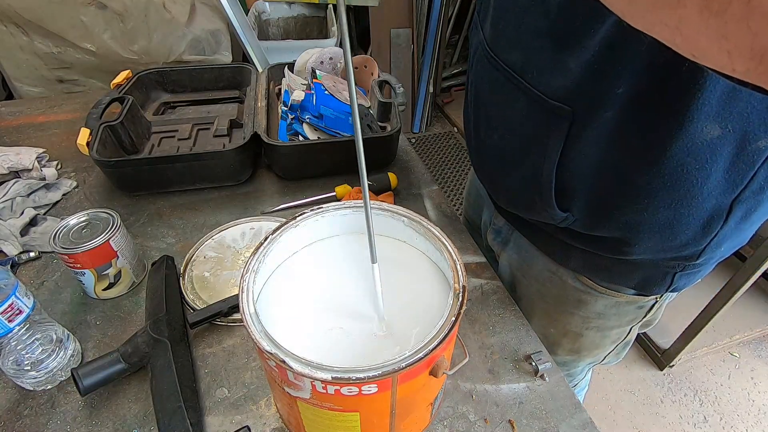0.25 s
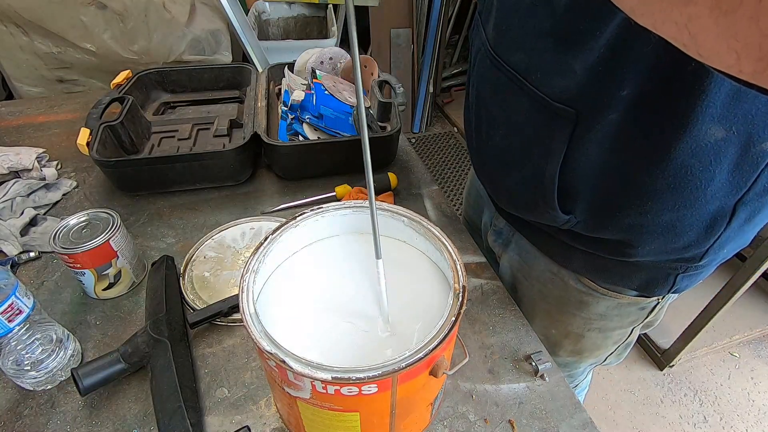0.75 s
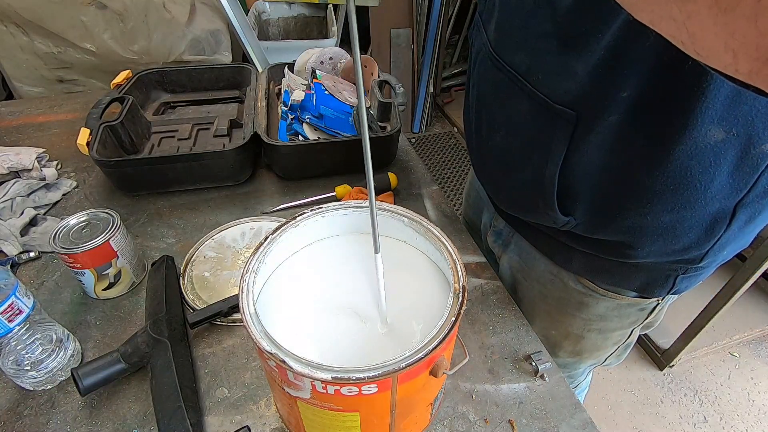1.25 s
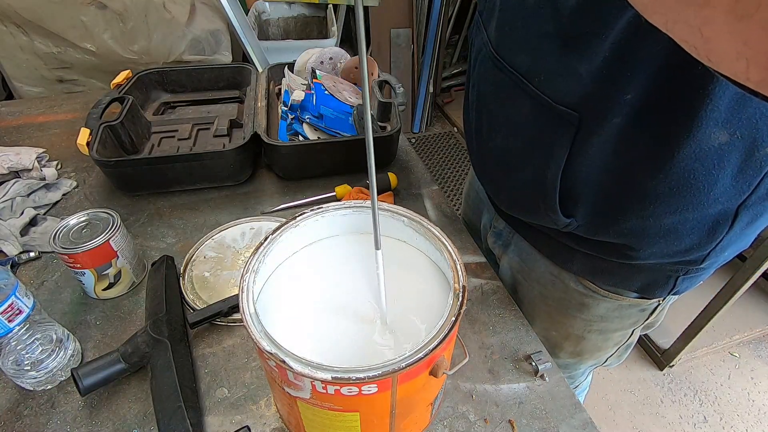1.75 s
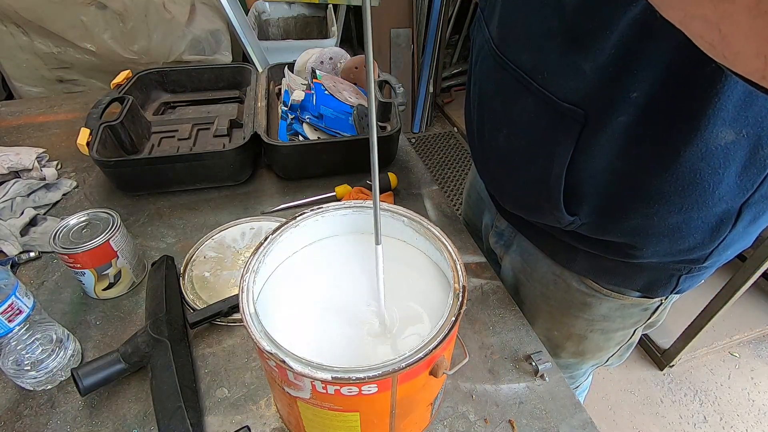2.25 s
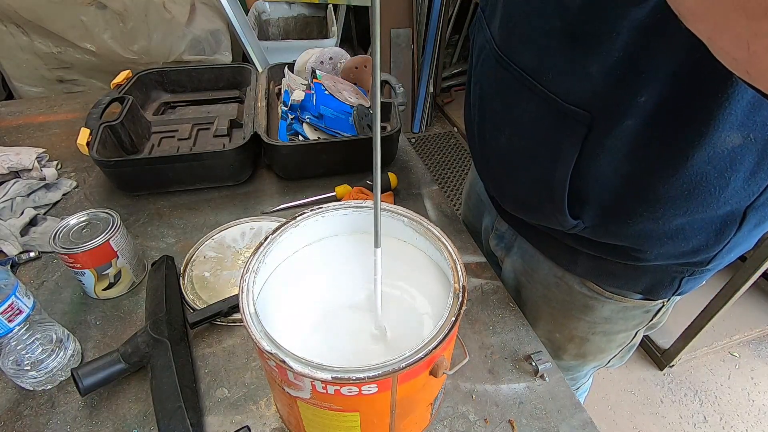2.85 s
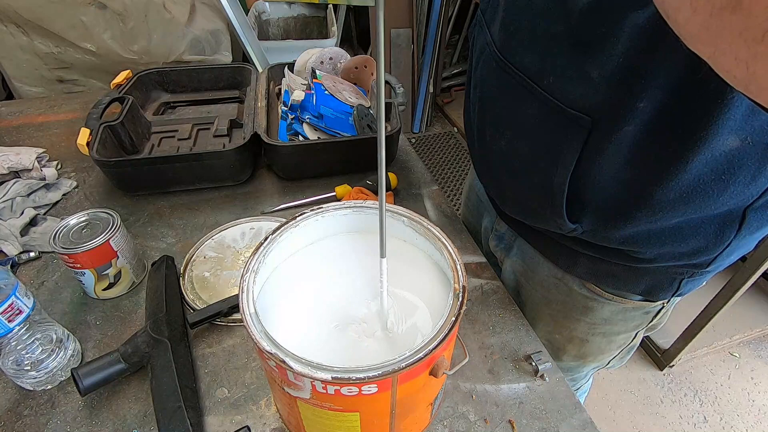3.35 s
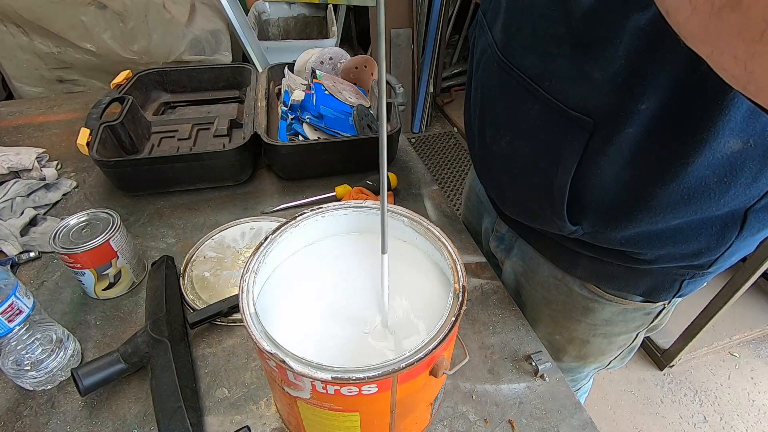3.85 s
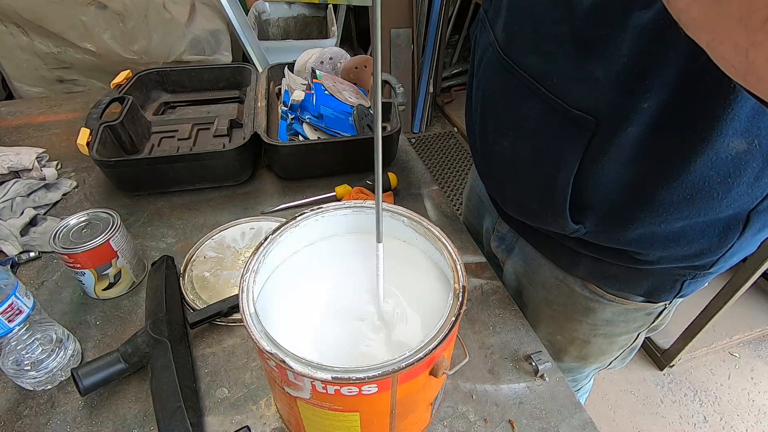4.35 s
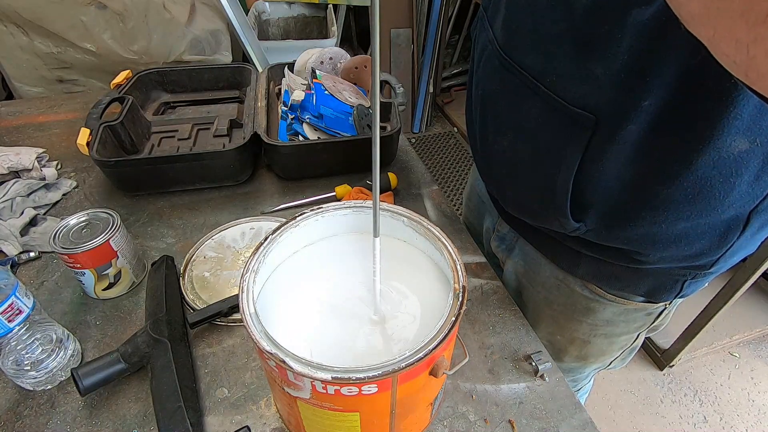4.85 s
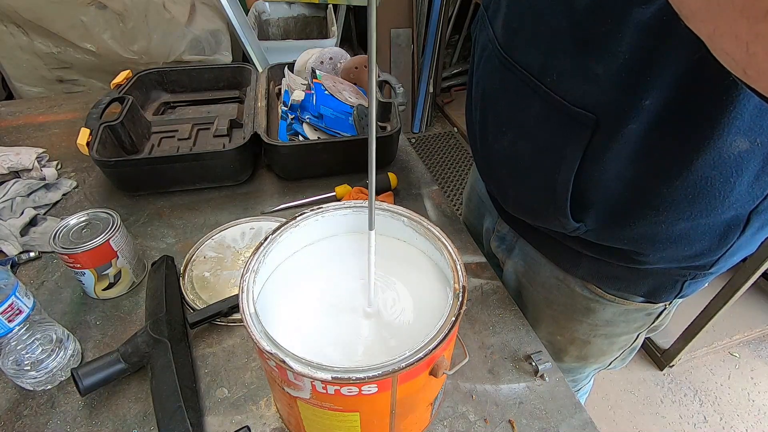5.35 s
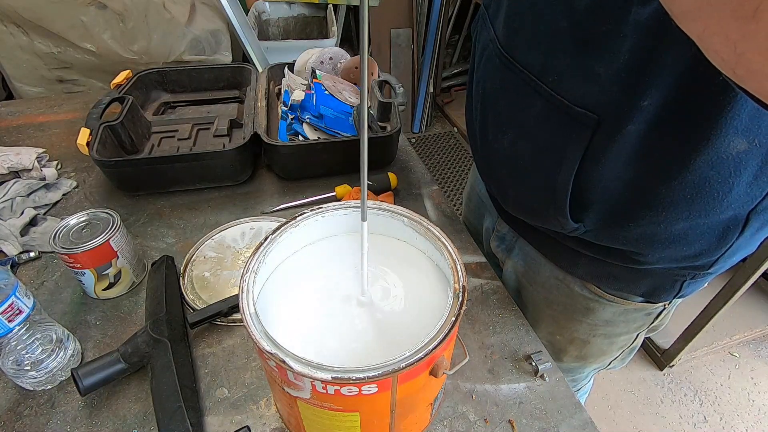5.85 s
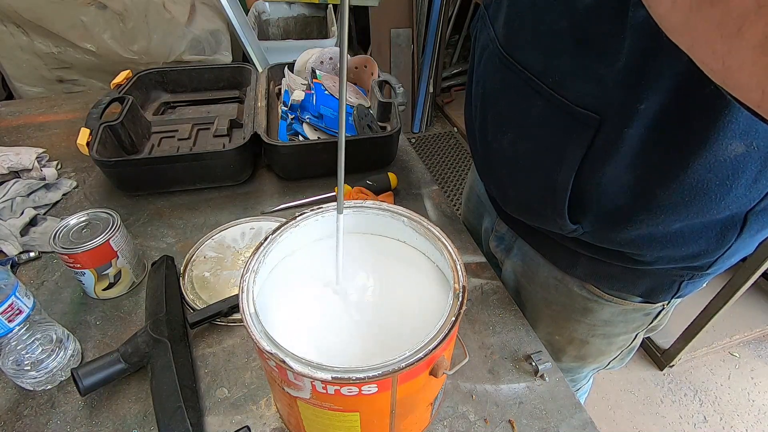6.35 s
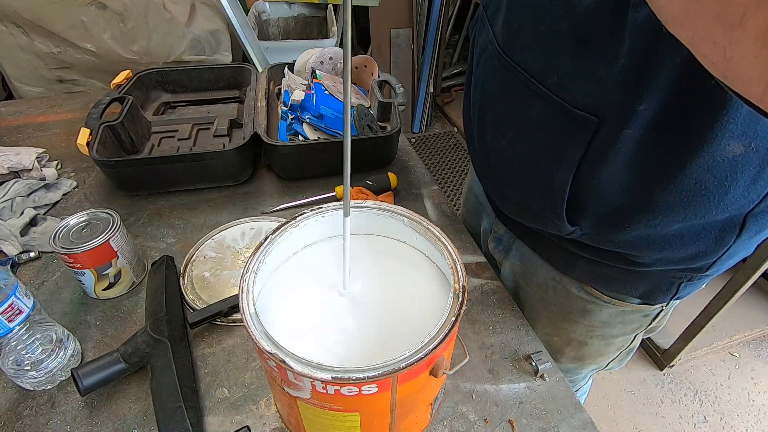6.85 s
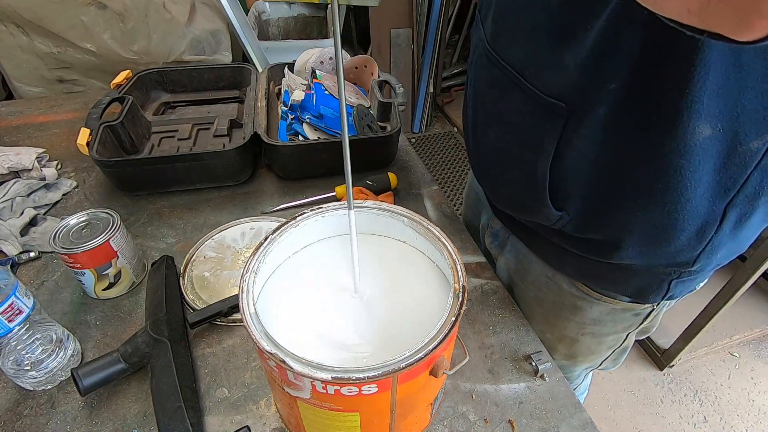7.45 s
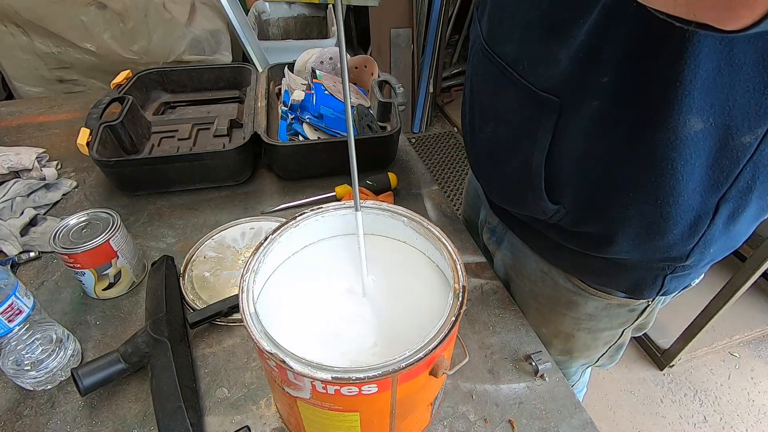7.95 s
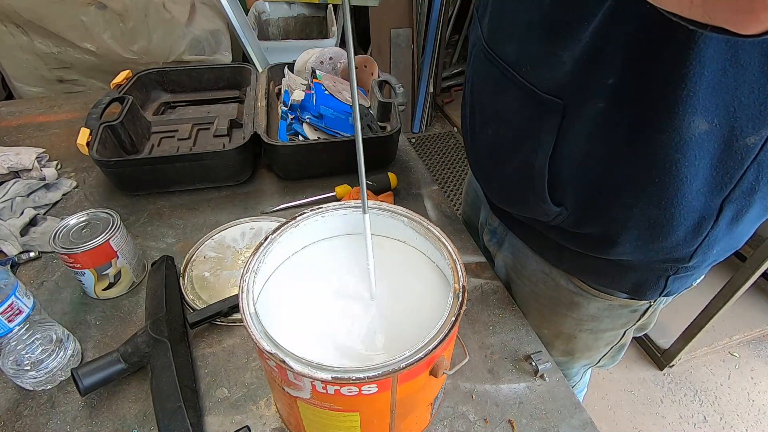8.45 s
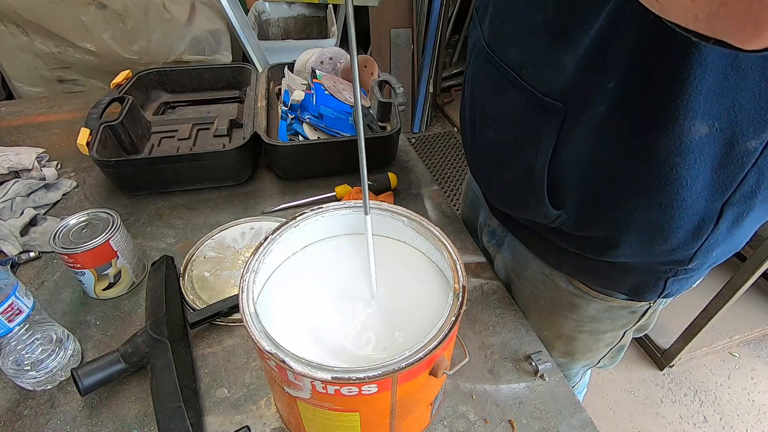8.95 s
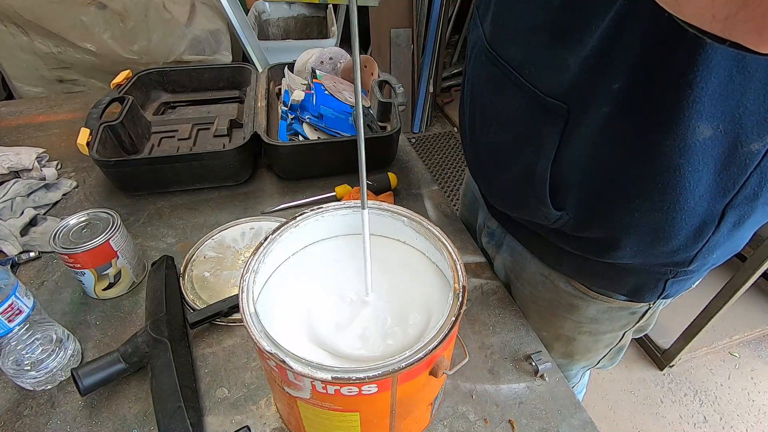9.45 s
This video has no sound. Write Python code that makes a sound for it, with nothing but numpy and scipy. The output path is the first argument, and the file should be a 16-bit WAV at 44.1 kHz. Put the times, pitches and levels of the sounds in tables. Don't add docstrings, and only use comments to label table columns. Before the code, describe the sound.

Steady, noisy electric drill at close range, with buzzing gear teeth, ringing housing, airy fan hiss and a piercing thin whine, leaning somewhat left. After almost nine seconds it stops fast with a falling squeal and a cluster of dry clacks, leaving a short room echo and a faint slide. One small falling bird chirp follows from outside, then a trigger click, a loud chuck knock and the motor climbing again.

```python
import sys
import numpy as np
from scipy import signal
from scipy.fft import rfft, irfft, next_fast_len
from scipy.io import wavfile

SR = 44100
rng = np.random.default_rng(int(sys.argv[2]) if len(sys.argv) > 2 else 0)


def convert_level_to_amplitude(level_db):
    exponent = np.asarray(level_db, float) / 20
    return 10 ** exponent


def wrap_up_sound(samples):
    columns = np.atleast_2d(samples).T
    tamed = np.clip(columns, -1, 1)
    steps = np.round(tamed * 32767).astype(np.int16)
    wavfile.write(sys.argv[1], SR, steps)


N = 427769
TIME, SIZE = np.arange(N) / SR, next_fast_len(N)
HZ = np.maximum(np.fft.rfftfreq(SIZE, 1 / SR), 1)


def rms_one(x):
    return x / np.sqrt(np.mean(x ** 2) + 1e-20)


def in_time(rows):
    s, *columns = np.transpose(rows)
    return [np.interp(TIME, s, c) for c in columns]


def at_hz(points, hz):
    point_hz, value = np.array(points)[:, :2].T
    return np.interp(np.log(hz), np.log(np.maximum(point_hz, 1)), value)


def during(rows, fade_s=0.0031):
    inside_s = np.minimum(TIME - rows[0][0], rows[-1][0] - TIME)
    return np.clip(inside_s / fade_s + 1, 0, 1)


def drift(rate_hz):
    r = np.exp(-2 * np.pi * rate_hz * 40 / SR)
    slow = signal.lfilter([1], [1, -2 * r, r * r], rng.standard_normal(N // 40 + 2002))[2000:]
    return np.interp(np.arange(N) / 40, np.arange(len(slow)), rms_one(slow))


def pan(left_over_right_db):
    return convert_level_to_amplitude(np.multiply.outer([.5, -.5], left_over_right_db))


# pitch_hz, shared_fraction
ALIKE = [(60, 0.23), (350, 0.98), (700, 0.87), (1400, 0.75), (3000, 1), (5500, 0.88), (9000, 0.54),
         (14000, 0.13)]
# pitch_hz, left_over_right_db
LEAN = [(60, 0.0), (110, 0.5), (200, -1), (370, 0), (690, 5.5), (1270, 6.5), (2340, 7), (4310, 2),
        (7940, 2.5), (14600, 20)]
# pitch_hz, left_lead_rad
LEAD = [(350, .6), (690, .2), (1030, -.6), (2150, -.5), (3270, -.4), (4500, .3), (5800, 1.3), (7150, 2),
        (9390, 2.9), (11700, 2.6), (14000, 3.3)]


def port_noise(*colours, pulsing=1, at_drill=1):
    shared, left, right = rfft(rng.standard_normal((3, N)) * pulsing, SIZE)
    alike = np.clip(at_hz(ALIKE, HZ), 0, 1)
    turn = np.exp(.5j * at_drill * np.multiply.outer([1, -1], at_hz(LEAD, HZ)))
    both = np.sqrt(alike) * shared * turn + np.sqrt(1 - alike) * np.array([left, right])
    both *= pan(at_drill * at_hz(LEAN, HZ))
    layers = [irfft(both * convert_level_to_amplitude(at_hz(colour, HZ)), SIZE)[:, :N] for colour in colours]
    return [x / np.sqrt(np.mean(x.mean(axis=0) ** 2)) for x in layers]


BOG_S, BOG_WIDTH_S, BOG_TURNS = 2.75, 0.27, 1.35


def bog():
    return np.exp(-((TIME - BOG_S) / BOG_WIDTH_S) ** 2)


# time_s, tilt_db
TILT = [(0.0, 4), (0.4, 1), (0.8, -5), (2.3, -6.5), (3.25, -1), (3.55, 0), (4.5, 7), (5.2, 5), (5.7, 1.5),
        (6.25, 8), (6.75, 8), (7.15, 3), (7.5, 3), (7.75, 5), (8.5, 7), (8.77, 3)]
TURN_S, TURN_TAKES_S = 7.34, 0.3


def aimed(db, tilt_share, turned_db, bogged_db, deeper_db=0):
    turned = np.clip((TIME - TURN_S) / TURN_TAKES_S + .5, 0, 1)
    deeper = np.clip((TIME - BOG_S) / BOG_WIDTH_S + 1, 0, 1)
    handled_db = tilt_share * in_time(TILT)[0] + turned_db * turned
    return db + handled_db + bogged_db * bog() + deeper_db * deeper


# pitch_hz, left_lead_rad
TONE_LEAD = [(350, 1), (720, 1), (1440, -.5), (4300, -.5), (5760, 1.3), (7300, .3), (8300, -.1)]


def lines(rows, orders, levels, waver_db=None):
    gate = during(rows)
    on = slice(*np.flatnonzero(gate)[[0, -1]])
    speed = (in_time(rows)[0] - BOG_TURNS * bog())[on]
    angle = 2 * np.pi * np.cumsum(speed) / SR
    out = np.zeros((2, N))
    for multiple, db in zip(orders, levels):
        hz = multiple * speed.mean()
        lead = .5 * at_hz(TONE_LEAD, hz) * np.array([[1], [-1]])
        start = rng.uniform(0, 2 * np.pi) + lead
        level_db = (db + waver_db * drift(8.0))[on] if waver_db else db
        tone = np.sqrt(2) * convert_level_to_amplitude(level_db) * np.sin(multiple * angle + start)
        out[:, on] += pan(0.14 * at_hz(LEAN, hz))[:, None] * tone
    return out * gate


# time_s, motor_turns_per_s
STIR = [(0.0, 357.5), (0.25, 358.4), (1.25, 359.55), (2.25, 359.8), (3.5, 359.65), (4.25, 360.35),
        (5.25, 360.9), (6.25, 361.6), (7.0, 361.95), (7.75, 361.9), (8.25, 362.22), (8.77, 362.2)]
STRONG_ORDERS = [16, 4, 8, 23, 9.182, 10, 10.182]
# level_db, tilt_share, turned_db, bogged_db, deeper_db
STRONG = [(-46.5, 0.06, -11, 3.5, 1), (-55.5, -0.14, 2, -2, 0.1), (-65, 0.2, -3, 0, 10.5),
          (-65.5, 0.78, 0.1, 5, -0.3), (-53.5, -0.65, -3, -2.5, 1.5), (-73, 0.24, 5, 3, 0.1),
          (-63, 0.05, 5, 2, 1.5)]
WEAK_ORDERS = [1, 1.058, 1.271, 2, 3, 6, 7, 9.125, 11.182, 12, 15, 20.363]
WEAK_DB = [-71, -77, -82, -82, -77, -72, -70, -61, -72, -65, -71, -71]
# time_s, motor_turns_per_s, whine_db
BRAKE = [(8.77, 356, -60), (8.79, 343, -52), (8.80, 332, -44), (8.815, 312, -41), (8.832, 281, -43),
         (8.845, 255, -47), (8.857, 235, -58)]
BRAKE_ORDERS = [4, 6, 10, 14, 16]
BRAKE_DB = [-13, 0, 1, -7, -12]
# time_s, motor_turns_per_s, whine_db
RESTART = [(9.58, 160, -64), (9.61, 184, -57), (9.65, 206, -55), (9.67, 218, -56), (9.7, 234, -52)]
RESTART_ORDERS = [1, 2, 3, 4, 5, 6, 7, 8]
RESTART_DB = [-11, -8, 0, -2, -4, -3, -6, -7]


def motor():
    out = lines(STIR, STRONG_ORDERS, [aimed(*row) for row in STRONG], waver_db=0.33)
    out += lines(STIR, WEAK_ORDERS, WEAK_DB)
    out += convert_level_to_amplitude(in_time(BRAKE)[1]) * lines(BRAKE, BRAKE_ORDERS, BRAKE_DB)
    climb_db = in_time(RESTART)[1] + 2.6 * drift(40)
    out += convert_level_to_amplitude(climb_db) * lines(RESTART, RESTART_ORDERS, RESTART_DB, waver_db=1.5)
    return out


SWITCHING_HZ, SWITCHING_DB = 7986, -52


def chopped_current():
    rotor = 2 * np.pi * np.cumsum(in_time(RESTART)[0]) / SR
    carrier = 2 * np.pi * SWITCHING_HZ * TIME
    chop = np.sin(carrier + rotor) + .7 * np.sin(carrier - rotor)
    level = convert_level_to_amplitude(SWITCHING_DB + 1.5 + 1.8 * drift(60)) * during(RESTART, fade_s=0.046)
    return level * chop * [[1.2], [.6]]


# time_s, level_db
STALL = [(9.37, -90), (9.39, -76), (9.455, -77), (9.475, -74), (9.51, -72), (9.52, -90)]
STALL_HZ = 1990


def stall_hum():
    level = convert_level_to_amplitude(in_time(STALL)[0] + 2.5 * drift(30)) * during(STALL)
    return level * np.sin(2 * np.pi * STALL_HZ * TIME)


# time_s, level_db against stirring
LET_GO = [(8.73, 0.0), (8.75, 0.5), (8.834, -1.5), (8.84, -6), (8.86, -6)]
# time_s, level_db against stirring
RERUN = [(9.515, 0), (9.53, -6), (9.555, -7), (9.575, -2), (9.6, 2.5), (9.65, 3.5), (9.7, 3)]
# level_db, tilt_share, turned_db, bogged_db, drive_share
GEARS = [
    (-41.5, 0.051, 0.6, 0.2, 0.93),
    (-48, -0.05, -2.5, 1.5, 0.72),
    (-51, 0.073, -2, 0.7, 0.6),
    (8, -0.09, -0.3, -1.5, 0.1),
]
# pitch_hz, density_db per Hz
RATTLE = [(250, -75), (340, -28.5), (520, -25.5), (830, -17.5), (1070, -9.5), (1340, -12), (1700, -11),
          (2300, -6), (2700, -4.5), (3000, 1.5), (3300, 1), (3650, -1.5), (3950, -11.5), (4400, -39.5)]
# pitch_hz, density_db per Hz
RING = [(3500, -25), (3950, 0), (4300, 4), (4900, 3), (5400, -4), (5800, -49)]
# pitch_hz, density_db per Hz
HISS = [(4900, -27.5), (5500, 2), (6150, -1.5), (6700, 3.5), (7500, 3), (8200, -3.5), (10200, -7),
        (11400, -20), (12000, -29.5), (13000, -26), (14000, -35)]
ENGAGE_S, IDLE_FAN_DB = 9.565, -2
SLOW_FAN_DB, SLOW_RING_DB, SLOW_LEAN_DB = 1.5, 3.5, -3
RESTART_HISS_CUT_HZ, SLOW_CHATTER_DB = 7600, 3


def gears():
    drive_db = in_time(LET_GO + RERUN)[0]
    slow = TIME > LET_GO[-1][0] + .1
    rattle_db, ring_db, hiss_db, lean_db = [aimed(*row) + share * drive_db for *row, share in GEARS]
    hiss_db += slow * np.where(TIME < ENGAGE_S, IDLE_FAN_DB, SLOW_FAN_DB)
    ring_db = ring_db + slow * SLOW_RING_DB
    lean_db = lean_db + slow * SLOW_LEAN_DB
    running = np.maximum(during([STIR[0], LET_GO[-1]]), during(RERUN))

    rotor = 2 * np.pi * np.cumsum(in_time(STIR)[0] - BOG_TURNS * bog()) / SR
    pulsing = convert_level_to_amplitude(.5 * np.sin(rotor)) * convert_level_to_amplitude(0.18 * drift(130))
    rattle, ring, hiss = port_noise(RATTLE, RING, HISS, pulsing=pulsing)
    dull = signal.sosfilt(signal.butter(2, RESTART_HISS_CUT_HZ, fs=SR, output="sos"), hiss)
    hiss = np.where(slow, dull, hiss)
    rattle = rattle * convert_level_to_amplitude(slow * SLOW_CHATTER_DB * drift(90))

    paddle = np.sin(rotor / 19.1)
    wobble = .5 * drift(19) + 0.16 * paddle
    low = convert_level_to_amplitude(rattle_db - 1.32 + 0.57 * wobble) * rattle
    low += convert_level_to_amplitude(ring_db - 2.5 + 0.71 * wobble) * ring
    high = convert_level_to_amplitude(hiss_db + 0.88 + 0.65 * wobble + 0.45 * drift(5.9)) * hiss
    return running * (low * pan(lean_db - 5.5) + high)


# start_s, peak_db, decay_t60_s, tilt_db_per_octave, ring_db
CLACKS = [(8.775, -33, .01, 0, 1), (8.841, -18, 0.0053, 3.5, -14), (8.842, -34, 0.026, 2, 11),
          (8.869, -30, 0.024, 6, 5), (8.874, -26, 0.016, 3, 4), (8.877, -29, 0.029, 2, -12),
          (8.892, -28.5, 0.031, 3, 2), (9.066, -43, 0.034, 0.5, 1), (9.434, -54.5, 0.051, 0, 0),
          (9.511, -42, .04, 2, 6), (9.5166, -41, 0.018, 2, 19), (9.525, -39, 0.022, -12, -8),
          (9.560, -38, 0.024, 4, -4), (9.5649, -13, 0.012, -2.5, -3), (9.5667, -15, 0.014, 4, 2),
          (9.58, -44, .01, 0, 10), (9.585, -38, .01, 0, 10)]
# pitch_hz, density_db per Hz
CLACK_COLOUR = [(120, -55), (200, -40), (707, -14), (1180, 1), (2050, -5), (3260, 2), (5270, -10),
                (8360, -16), (9640, -20), (14000, -46)]
# pitch_hz, level_db, decay_t60_s
HOUSING = [(3850, -33, .05), (3350, -23, .02), (3250, -43.5, .28), (2750, -28, .015), (200, -58, .05)]
CLACK_LEAN_DB, CHUCK_LEAN_DB = 6, 8


def clacks():
    out, ticks = np.zeros((2, N)), np.zeros(N) + 1e-18
    age = np.arange(4096) / SR
    hz = np.maximum(np.fft.rfftfreq(8192, 1 / SR), 1)
    white = rng.standard_normal((len(CLACKS), 2, 4096))
    for (s, db, t60, tilt_db, ring_db), (mid, side) in zip(CLACKS, white):
        lean_db = CHUCK_LEAN_DB if db > -18 else CLACK_LEAN_DB
        octaves = np.log2(np.clip(hz, 300, 12000) / 3000)
        colour = convert_level_to_amplitude(at_hz(CLACK_COLOUR, hz) + tilt_db * octaves)
        ports = mid + 0.47 * side * [[1], [-1]]
        burst = rms_one(irfft(rfft(ports, 8192) * colour)[:, :4096])
        attack = np.minimum(age / np.clip(0.055 * t60, .0002, .002), 1)
        decay = convert_level_to_amplitude(db - 3 - 60 * age / max(t60, .004))
        burst = burst * attack * decay * pan(lean_db)[:, None]
        i = round(s * SR)
        out[:, i:i + 4096] += burst[:, :N - i]
        ticks[i] = convert_level_to_amplitude(db + ring_db + 16)
    for mode_hz, db, t60 in HOUSING:
        r, w = convert_level_to_amplitude(-60 / (t60 * SR)), 2 * np.pi * mode_hz / SR
        out += convert_level_to_amplitude(db) * signal.lfilter([0, np.sin(w)], [1, -2 * r * np.cos(w), r * r], ticks)
    return out


# pitch_hz, density_db per Hz
SETTLE = [(300, -24), (900, -9.5), (2000, -8), (3250, 0), (4200, -10), (6500, -12), (8500, -37),
          (14000, -57)]
SETTLE_S, SETTLE_DB, SETTLE_T60_S = 9.066, -50, 0.39


def paddle_slide():
    fade = convert_level_to_amplitude(SETTLE_DB - 60 * np.abs(TIME - SETTLE_S) / SETTLE_T60_S) * (TIME > SETTLE_S)
    return fade * port_noise(SETTLE, at_drill=0.18)[0]


# time_s, pitch_hz, level_db
BIRD = [(9.25, 5350, -72), (9.275, 4700, -61), (9.293, 4220, -57), (9.31, 3800, -56), (9.335, 3430, -59),
        (9.37, 3150, -64), (9.41, 3000, -76)]


def bird():
    pitch_hz, db = in_time(BIRD)
    tone = np.sin(2 * np.pi * np.cumsum(pitch_hz * (1 + 0.022 * drift(200))) / SR)
    return convert_level_to_amplitude(db) * during(BIRD) * tone * (1 + 0.65 * drift(120))


ROOM_T60_S, ROOM_DB, ROOM_CUT_HZ = 0.66, -10.5, 7600


def room(x, t60):
    age = np.arange(int(1.2 * SR)) / SR
    echoes = rng.standard_normal((2, len(age))) * convert_level_to_amplitude(-60 * age / t60) * (age > .004)
    echoes = signal.lfilter([1], [1, -np.exp(-2 * np.pi * ROOM_CUT_HZ / SR)], echoes)
    return signal.fftconvolve(x[None], rms_one(echoes) / np.sqrt(len(age)), axes=1)[:, :N]


# time_s, peak_db
NUDGES = [(0.13, -78), (0.7, -79), (1.32, -75), (1.9, -81), (2.37, -71.5), (2.47, -73), (2.75, -80),
          (3.05, -77), (3.45, -76), (3.8, -79), (4.3, -82), (4.6, -83), (5.6, -86), (6.08, -79),
          (6.35, -80), (6.8, -79), (7.19, -74), (7.6, -81), (8.1, -81), (8.84, -76), (9.1, -79),
          (9.35, -77), (9.65, -70)]
# pitch_hz, density_db per Hz
RUMBLE_COLOUR = [(12, -38), (25, -15), (75, -23), (100, -30), (125, -23), (150, -8.5), (200, -7),
                 (310, -12), (340, -16.5), (440, -37)]
RUMBLE_DB, RUMBLE_SWAY_DB, NUDGE_RISE_DB_PER_S, NUDGE_FALL_DB_PER_S = -85.5, 2, 90, 48


def rumble():
    coarse = TIME[::64]
    s, db = np.transpose(NUDGES)[:, :, None]
    below_db = np.maximum(NUDGE_RISE_DB_PER_S * (s - coarse), NUDGE_FALL_DB_PER_S * (coarse - s))
    swell = np.interp(TIME, coarse, np.linalg.norm(convert_level_to_amplitude(db - below_db), axis=0))
    steady = convert_level_to_amplitude(RUMBLE_DB + RUMBLE_SWAY_DB * drift(3.8))
    return np.hypot(steady, swell) * port_noise(RUMBLE_COLOUR, at_drill=0)[0]


# pitch_hz, density_db per Hz
QUIET = [(250, -29), (340, -22), (560, -10.5), (830, -3), (1120, -21), (2000, -12), (3200, -11),
         (4500, -10), (6500, -20), (8000, -33), (12000, -48), (15000, -57)]
QUIET_DB = -74


def hush():
    return convert_level_to_amplitude(QUIET_DB) * port_noise(QUIET, at_drill=0)[0]


BODY_CUT_HZ = 240


def scene():
    body = signal.butter(4, BODY_CUT_HZ, "high", fs=SR, output="sos")
    drill = signal.sosfilt(body, gears() + clacks() + paddle_slide())
    whine = motor() + chopped_current() + stall_hum()
    chirp = bird()
    far = (convert_level_to_amplitude(-11) * chirp + room(chirp, t60=.5)) * pan(-9.0)[:, None]
    echo = convert_level_to_amplitude(ROOM_DB) * room(drill.mean(axis=0), ROOM_T60_S)
    return drill + echo + whine + far + rumble() + hush()


def top_cut(x):
    return signal.sosfilt(signal.butter(12, 15160, fs=SR, output="sos"), x)


def record(dry):
    mix = signal.sosfilt(signal.butter(6, 13900, fs=SR, output="sos"), dry)
    return top_cut(mix)


dry = scene()
out = record(dry)
wrap_up_sound(out)
```